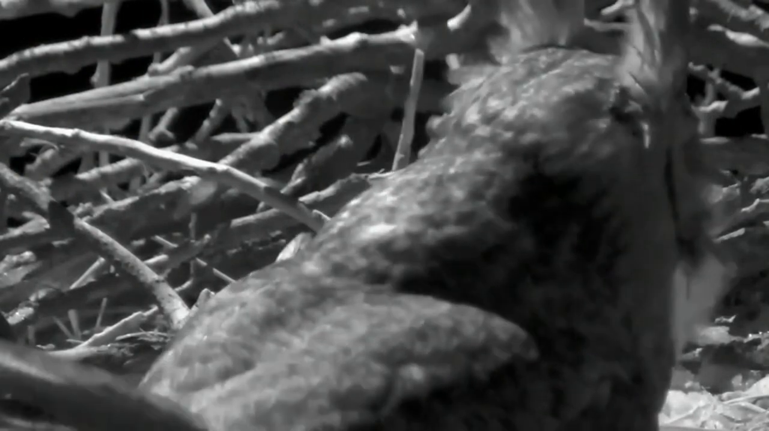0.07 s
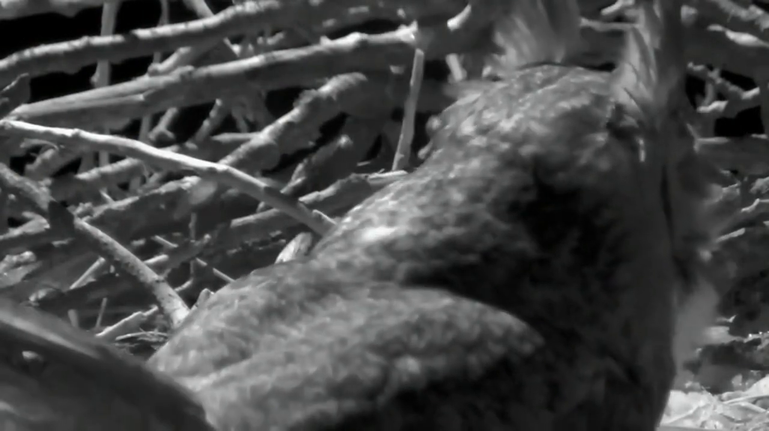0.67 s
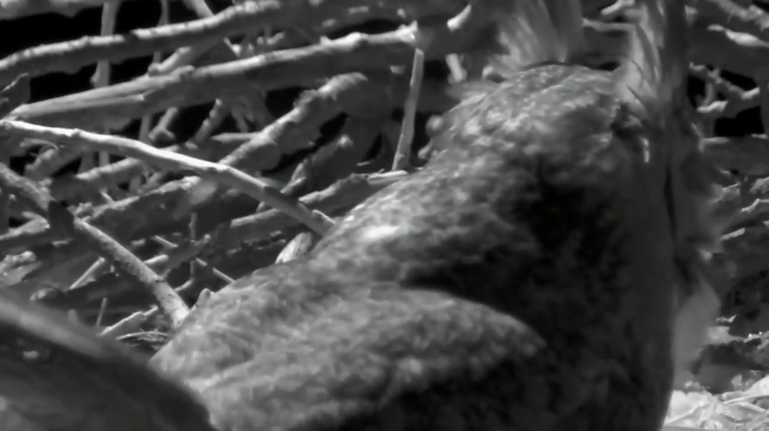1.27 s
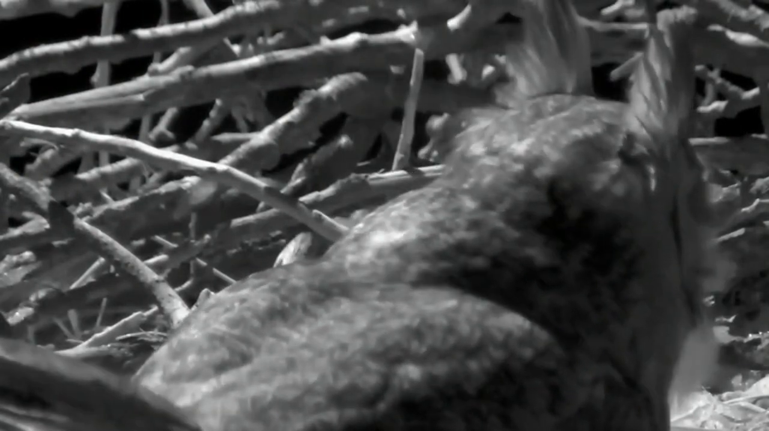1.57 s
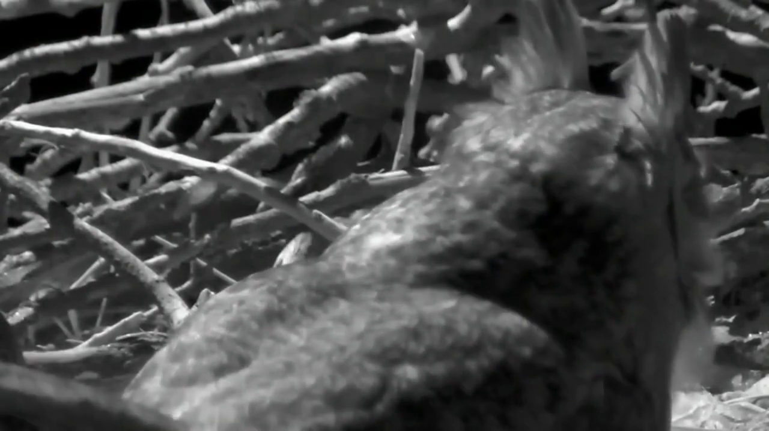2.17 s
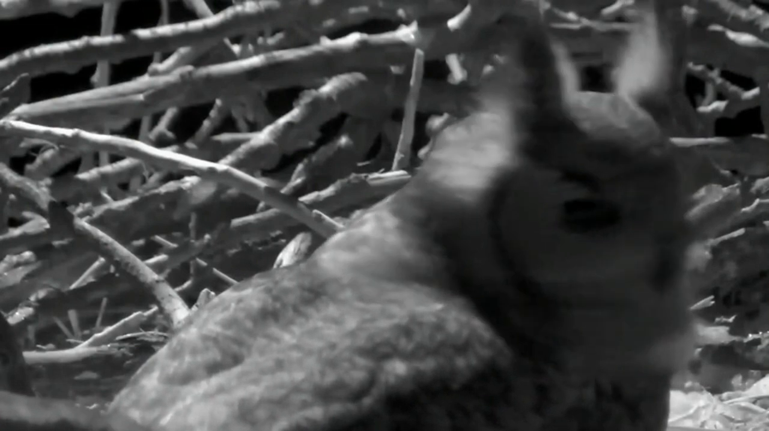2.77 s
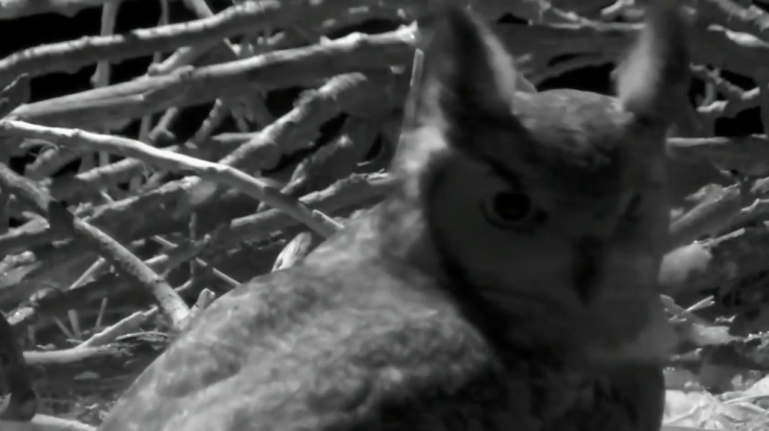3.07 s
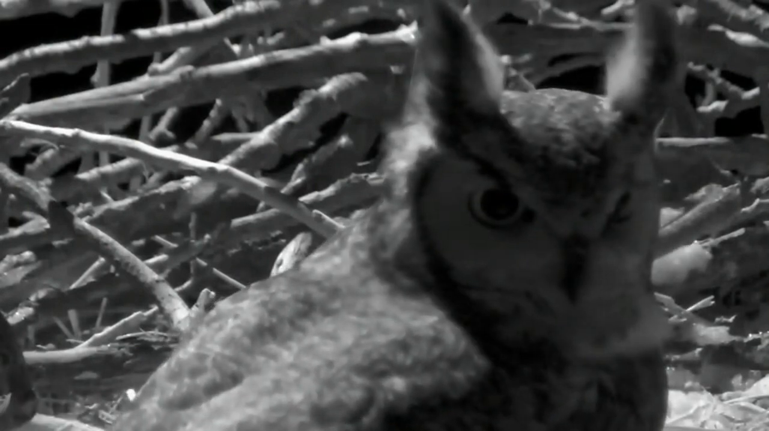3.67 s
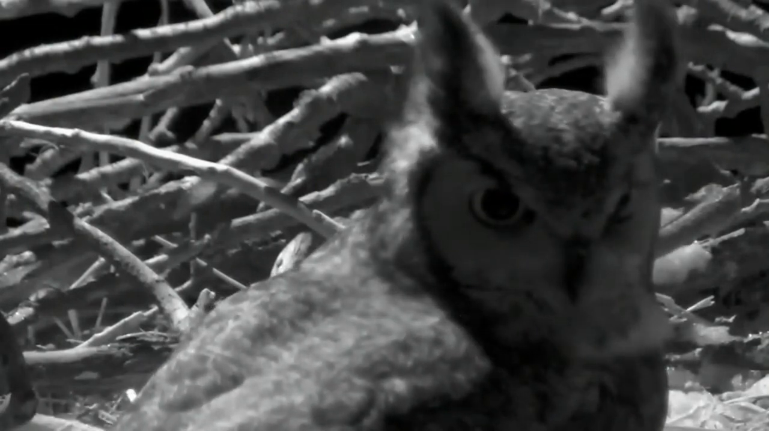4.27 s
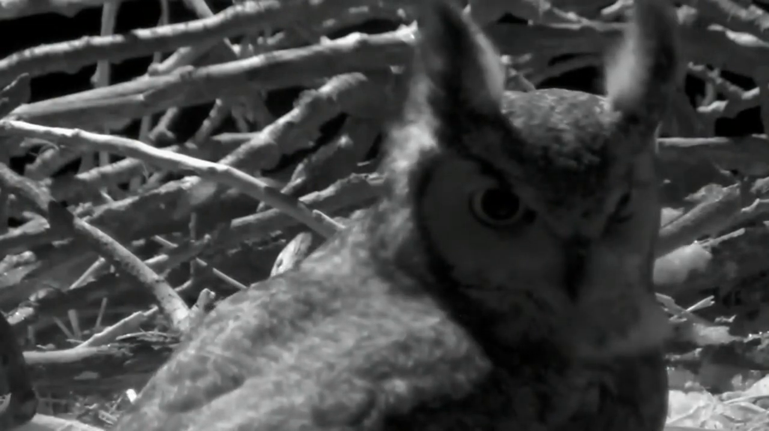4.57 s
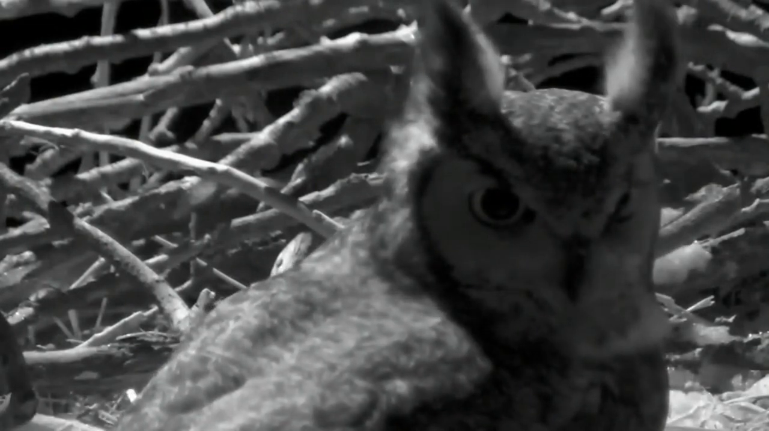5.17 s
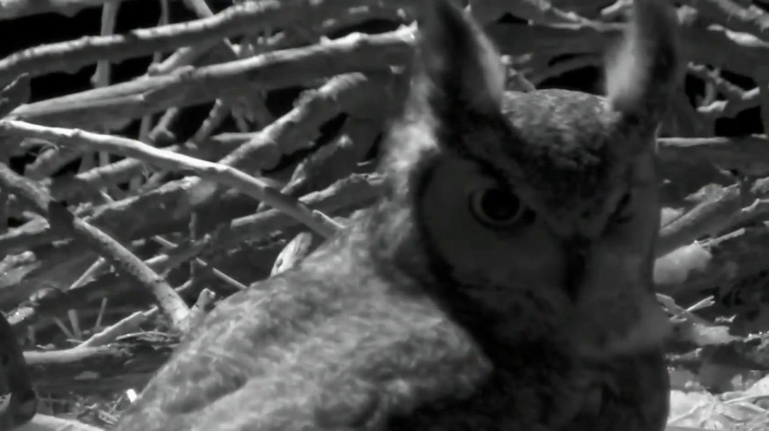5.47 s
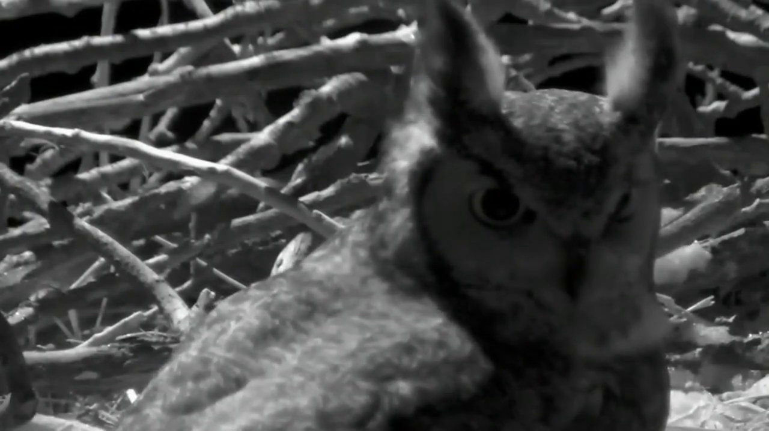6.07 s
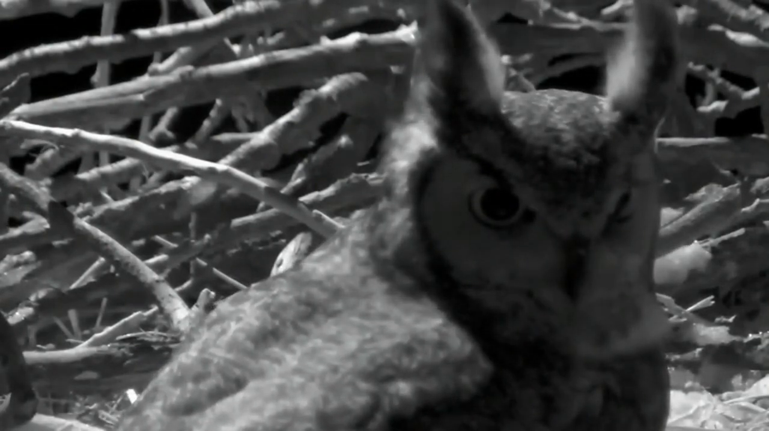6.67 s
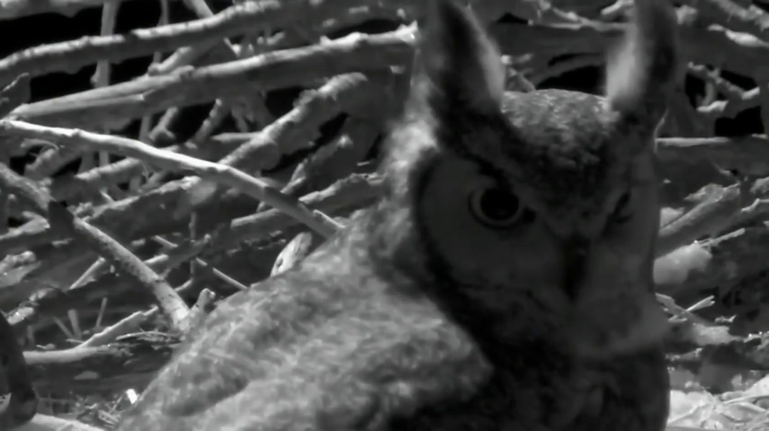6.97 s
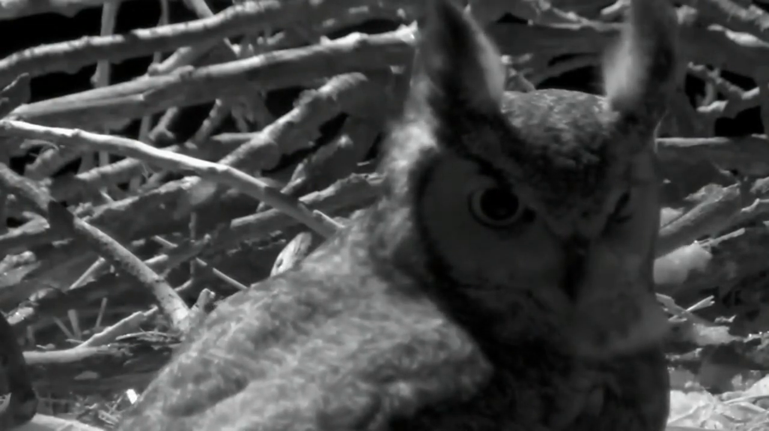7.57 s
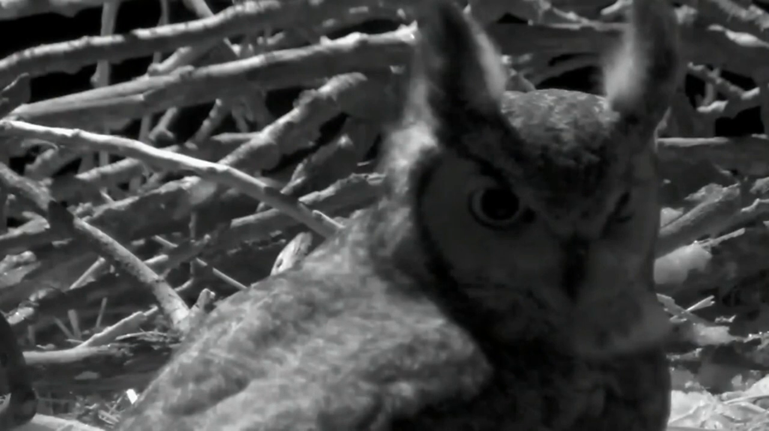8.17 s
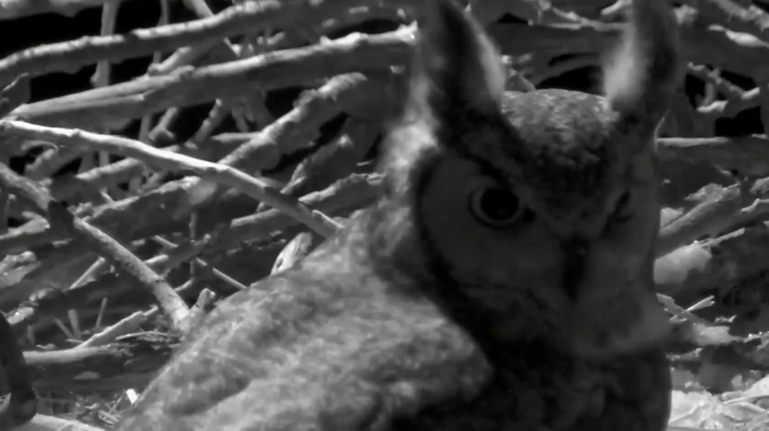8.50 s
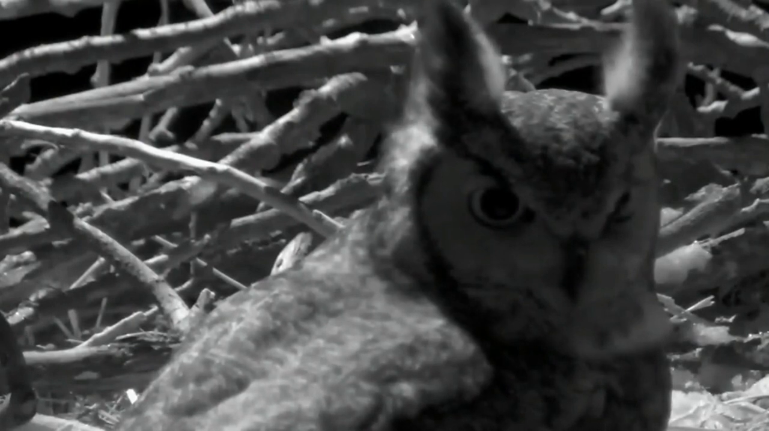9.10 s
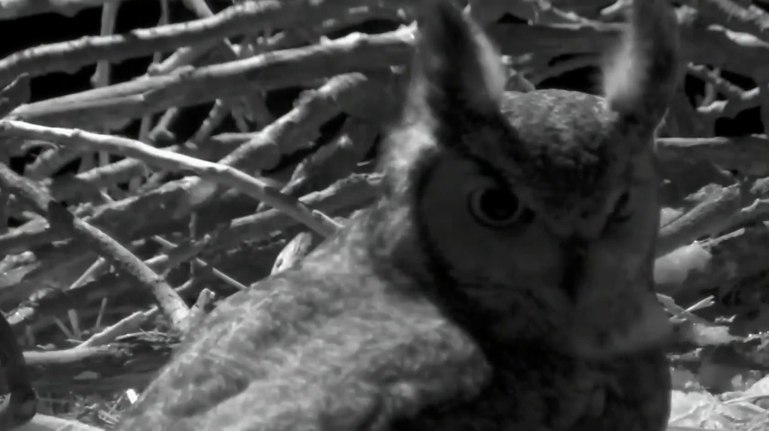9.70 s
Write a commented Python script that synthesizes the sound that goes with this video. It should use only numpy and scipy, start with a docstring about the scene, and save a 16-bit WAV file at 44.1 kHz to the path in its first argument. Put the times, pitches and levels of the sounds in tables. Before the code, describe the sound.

A large owl hoots low and close, its mate briefly overlapping, with small ticks and feather rustles over steady hiss and distant traffic.

```python
"""Owls at the nest, at night

A large owl hoots on its stick nest, close to the nest camera's microphone; its mate's lower voice
overlaps the first long note. Each hoot is a nearly pure tone that scoops up, holds and sags, and the
woods return it faintly. Ticks ring the camera housing, the nest bumps and feathers brush by, over hiss,
mains hum and a far road. The camera samples at a low rate."""
import sys
import numpy as np
from scipy import signal
from scipy.fft import rfft, irfft
from scipy.io import wavfile
from scipy.ndimage import map_coordinates

SR = 44100
rng = np.random.default_rng(int(sys.argv[2]) if len(sys.argv) > 2 else 0)


def generate_wav(sig):
    """Save sig (samples, or channels by samples) to the path in sys.argv[1] as 16-bit PCM at SR."""
    pcm = np.round(np.clip(np.atleast_2d(sig).T, -1, 1) * 32767).astype(np.int16)
    wavfile.write(sys.argv[1], SR, pcm)


N = 438354
T = np.arange(N) / SR


def owl():
    """The owl on the nest: a run of hoots close to the microphone."""
    # notes: start/s, end/s, attack/s, f/Hz, drift/(Hz/s), level/dB, swell/(dB/s), buzz/dB re fundamental
    hoots = [ (-.13, .102, 0.027, 300, 0, -27, 0, -33), (.944, 1.239, .012, 310, -55, -27, -14, -29.5),
             (1.249, 1.366, .024, 303, -66.5, -24, 3, -43),
             (1.373, 1.664, 0.02, 294.2, -32.5, -26.5, -9.5, -35.5),
             (1.658, 1.957, .023, 301, -14.5, -25.4, -1.5, -35),
             (2.445, 2.798, .027, 304.8, -8, -26, -7.5, -37.5),
             (3.206, 3.483, 0.02, 292.6, 16, -26, 7, -37), ]
    return voice(hoots, jitter=.0049, shimmer_db=.53, patchy_db=3.5)


def mate():
    """Its mate: two short, lower, less steady notes."""
    # notes: start/s, end/s, attack/s, f/Hz, drift/(Hz/s), level/dB, swell/(dB/s), buzz/dB re fundamental
    notes = [ (.361, .441, .028, 291.7, 0, -31.5, 0, -42),
             (.876, 1.027, .009, 287.4, -20, -29, 0.0017, -43.5), ]
    return voice(notes, jitter=.0067, shimmer_db=1.7, patchy_db=4.0)


def voice(notes, jitter, shimmer_db, patchy_db):
    """Each note is one swell of air: pitch and level rise and sag together, with weak overtones."""
    # the throat's gain on the low overtones: f/Hz, level/dB re fundamental
    throat = [(340, 7), (450, -5), (560, -14.5), (595, -16), (625, -24), (800, -39.5), (925, -31),
              (1220, -43), (1520, -27), (1830, -39.5), (2200, -47)]
    # narrow resonances that pick a thin buzz out of the high overtones: f/Hz, level/dB
    resonances = [(2150, -17), (2330, -13), (2470, 3.5), (2620, -12), (2780, -1.5), (2960, -5),
                  (3120, -8.5), (3350, -21.5)]
    pitch_sag, level_sag_db, choke_db = .43, 19.5, 6.5  # lost when the air pressure is gone
    edge_s, buzz_attack_s = .006, .11
    waver = 1 + jitter * walk(140)
    flutter_db = shimmer_db * walk(90)
    patches = {k: patchy_db * walk(16) for k in range(8, 12)}  # each buzz overtone comes and goes
    out = np.zeros(N)
    for start, end, attack, hz, drift, db, swell_db, buzz_db in notes:
        on = (T >= start - edge_s) & (T <= end + edge_s)
        t = T[on]
        from_middle = t - (start + end) / 2
        missing = pressure_loss(t, start, end, attack)
        pitch = (hz + drift * from_middle) * (1 - pitch_sag * np.minimum(missing, 1)) * waver[on]
        level_db = db + swell_db * from_middle - level_sag_db * missing - choke_db * missing ** 2
        phase = 2 * np.pi * np.cumsum(pitch) / SR
        tone = np.sin(phase)
        for k in range(2, 8):
            tone += response(throat, k * pitch) * np.sin(k * phase)
        build = np.clip((t - start) / buzz_attack_s, 0, 1)
        squeak_db = 5.5 * bell(t, end - .036, width=.017)  # just before the note ends
        for k, patch_db in patches.items():
            buzz = build * undb(buzz_db + squeak_db + patch_db[on])
            tone += buzz * response(resonances, k * pitch) * np.sin(k * phase)
        fade = np.clip(1 + np.minimum(t - start, end - t) / edge_s, 0, 1)
        out[on] += np.sqrt(2) * tone * fade * undb(level_db + flutter_db[on])
    return out


def pressure_loss(t, start, end, attack, release_s=.021):
    """Share of air pressure missing: about 1 at a note's ends, near 0 while held, some in a catch."""
    # catches in the throat that make a note stutter: t/s, share of pressure lost
    catches = [(.908, .42), (1.461, 0.19), (1.537, 0.085), (1.603, 0.035)]
    ends = np.exp(-(t - start) / attack) + np.exp(-(end - t) / release_s)
    return ends + sum(lost * bell(t, s, width=.018) for s, lost in catches)


def woods(x, t60, build_s, wet_db):
    """Scattered returns from trunks around the nest, building up late and dying away."""
    t = T[:2 * SR]
    build = 1 - np.exp(-(t / build_s) ** 2)
    echoes = rng.standard_normal(len(t)) * undb(-60 * t / t60) * build
    echoes /= np.sqrt(np.sum(echoes ** 2))
    return undb(wet_db) * signal.fftconvolve(x, echoes)[:N]


def ticks(rise_s, gain_db):
    """Light contacts right at the microphone ring the few short modes of the camera housing."""
    # housing modes: f/Hz, t60/s, level/dB
    modes = [(1202, 0.032, -7), (1531, 0.044, 1), (1604, 0.02, 2), (1710, 0.021, -18.5)]
    t = T[:SR // 10]
    out = np.zeros(N)
    for s, db in contacts():
        detunes = 1 + .016 * rng.standard_normal(len(modes))
        ring = sum(undb(mode_db - 60 * t / t60) * np.sin(2 * np.pi * hz * detune * t)
                   for (hz, t60, mode_db), detune in zip(modes, detunes))
        ring *= 1 - np.exp(-t / rise_s)
        start = int(s * SR)
        out[start:start + len(t)] += undb(db + gain_db) * ring / np.abs(ring).max()
    return out


def contacts(first_gap_s=.0057, slowing=1.4, loss_db=3):
    """Each tick, and the slowing, fading rattle that follows some: rows of t/s, level/dB."""
    # ticks and one sharp knock on the housing: t/s, level/dB, rattle length/s
    hits = [(0.244, -36, .01), (0.367, -36.5, 0), (0.419, -36, .01), (.592, -37, 0), (0.688, -34.5, 0),
            (0.7124, -35, 0), (.956, -23.5, .065), (2.248, -44, 0), (2.446, -39.5, 0), (2.5132, -37, .04),
            (5.805, -40, 0), (5.938, -34.5, 0), (6.3055, -41, 0), (6.474, -36, 0)]
    delays = np.append(0, np.cumsum(first_gap_s * slowing ** np.arange(6)))
    return [(s + delay, db - k * loss_db) for s, db, length in hits
            for k, delay in enumerate(delays) if delay <= length]


def rustles():
    """Feathers brush as the bird bows and turns its head: short swells of noise."""
    # strokes: t/s, length/s, level/dB
    strokes = [(0.352, 0.082, -49), (0.961, 0.24, -47.5), (1.721, 0.18, -50), (2.505, 0.081, -44),
               (3.24, 0.2, -46.5)]
    # feathers heard through the housing: f/Hz, level/dB
    spectrum = [(300, -22), (900, -6.5), (1250, -10.5), (1530, 5), (1850, -7.5), (2500, -21.5),
                (3800, -24.5)]
    envelope = sum(undb(db) * swell(s, length) for s, length, db in strokes)
    return envelope * colour(rng.standard_normal(N), spectrum)


def bumps(skirt_db):
    """The nest takes the bird's shifting weight: low, narrow-band shudders."""
    # dull bumps through the nest: t/s, length/s, centre f/Hz, level/dB
    shudders = [(0.948, 0.098, 97, -46), (1.68, 0.42, 48, -61.5), (3.25, 0.27, 70, -69)]
    out = np.zeros(N)
    for s, length, hz, db in shudders:
        band = [(hz / 4, skirt_db), (hz, 0), (hz * 2, skirt_db), (hz * 8, 4 * skirt_db)]
        out += undb(db) * swell(s, length) * colour(rng.standard_normal(N), band)
    return out


def hiss(level_db, grain_db, flicker_db):
    """Slightly grainy hiss, coloured by the hollow of the housing; the level dips once, briefly."""
    # hiss at the microphone: f/Hz, relative level/dB
    spectrum = [(20, -16.5), (60, -18), (140, -20.5), (300, -15.5), (500, -12.5), (950, -14), (1200, -12.5),
                (1400, -4), (1560, 2), (1750, -8), (2000, -14), (2600, -21.5), (3200, -21), (3900, -28)]
    grains = rng.standard_normal(N) * undb(grain_db * walk(300) + flicker_db * walk(25))
    dip_db = -4 * bell(T, 6.27, width=.035)
    return colour(grains, spectrum) * undb(level_db + dip_db)


def road(start_db, rise_db_per_s, wander_db):
    """Far traffic draws slowly nearer, with a few surges."""
    # tyre roar from a distance: f/Hz, relative level/dB
    spectrum = [(100, -22.5), (240, -15), (380, -17.5), (600, -12), (720, -4), (850, -3.5), (965, 1.5),
                (1060, -5), (1200, -8), (1500, -7), (2200, -38)]
    # surges of traffic: t/s, half width/s, lift/dB
    surges = [(3.7, .3, 2.5), (6.7, 0.26, 3.5), (7.8, 0.74, 2.6), (9.7, 0.15, 2.5)]
    surge_db = sum(db * bell(T, s, width) for s, width, db in surges)
    roar = colour(rng.standard_normal(N), spectrum)
    return roar * undb(start_db + rise_db_per_s * T + surge_db + wander_db * walk(9))


def hum():
    """Faint, steady mains hum in the camera."""
    # mains harmonics: f/Hz, rms level/dB
    harmonics = [(120, -73), (180, -75.5)]
    return sum(np.sqrt(2) * undb(db) * np.sin(2 * np.pi * hz * T) for hz, db in harmonics)


def undb(db):
    """Decibels to gain."""
    return 10 ** (np.asarray(db) / 20)


def response(points, hz):
    """Gain of a spectrum (f/Hz, level/dB) at these frequencies."""
    f, db = np.transpose(points)
    return undb(np.interp(np.log(np.maximum(hz, 1)), np.log(f), db))


def shape(x, points):
    """Filter by a spectrum (f/Hz, level/dB)."""
    hz = np.arange(N + 1) * SR / (2 * N)
    return irfft(rfft(x, 2 * N) * response(points, hz))[:N]


def colour(x, points):
    """Give a noise this spectrum, at rms 1."""
    shaped = shape(x, points)
    return shaped / np.sqrt(np.mean(shaped ** 2))


def walk(rate):
    """Random levels, rate of them a second, joined by lines."""
    knots = rng.standard_normal(8192)
    return np.interp(T * rate, np.arange(len(knots)), knots)


def swell(s, length):
    """An envelope that rises fast and fades."""
    return np.sin(np.pi * np.sqrt(np.clip((T - s) / length, 0, 1)))


def bell(t, centre, width):
    """A smooth bump of height 1."""
    return np.exp(-((t - centre) / width) ** 2)


def scene():
    """From the nest, in mono: two owls and their echo, small noises close by, the night behind."""
    owls = owl() + mate()
    nest = ticks(rise_s=.0018, gain_db=1.0) + bumps(skirt_db=-24) + rustles()
    night = hiss(level_db=-45.5, grain_db=.6, flicker_db=.88) + hum()
    night += road(start_db=-60.5, rise_db_per_s=1.2769, wander_db=1.14)
    echo = woods(owls, t60=.75, build_s=.075, wet_db=-30)
    return (owls + echo + nest + night)[None]


def record(dry):
    """The camera joins its slow samples with short curves, mirroring the sound faintly into the treble."""
    # treble response of the camera's output: f/Hz, level/dB
    treble = [(4000, 0), (6500, 0), (9500, 2), (11000, 6), (13000, 2.5), (14500, -1)]
    camera_rate_hz, top_hz, noise_db = 8000, 15000, -93.5
    slow = signal.resample_poly(dry[0], camera_rate_hz, SR, window=("kaiser", 8))
    joined = map_coordinates(slow, [T * camera_rate_hz], order=2, mode="nearest")
    out = shape(joined, treble) + undb(noise_db) * rng.standard_normal(N)
    lowpass = signal.ellip(8, .2, 70, top_hz, fs=SR, output="sos")
    return signal.sosfilt(lowpass, out)[None]


dry = scene()
out = record(dry)
generate_wav(out)
```